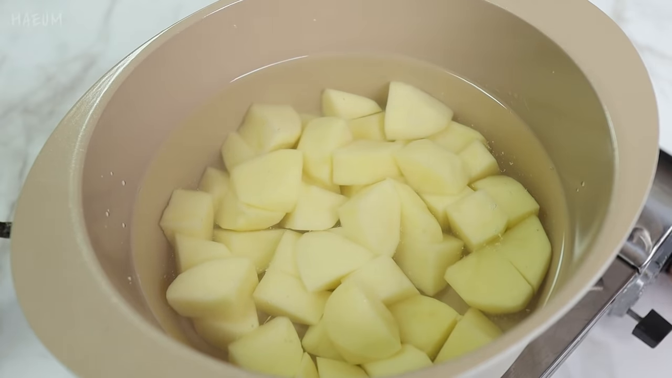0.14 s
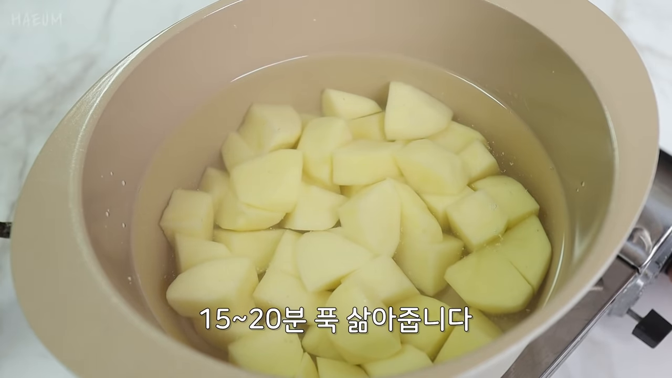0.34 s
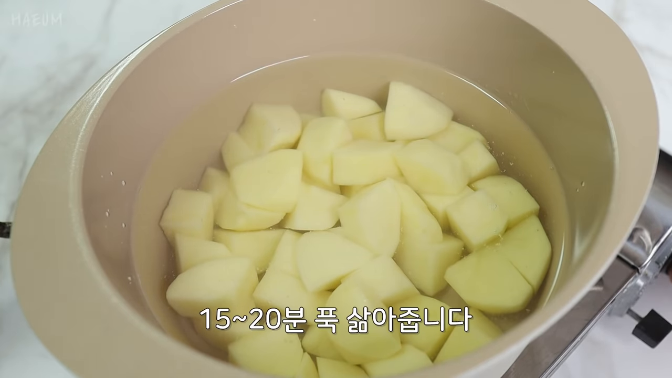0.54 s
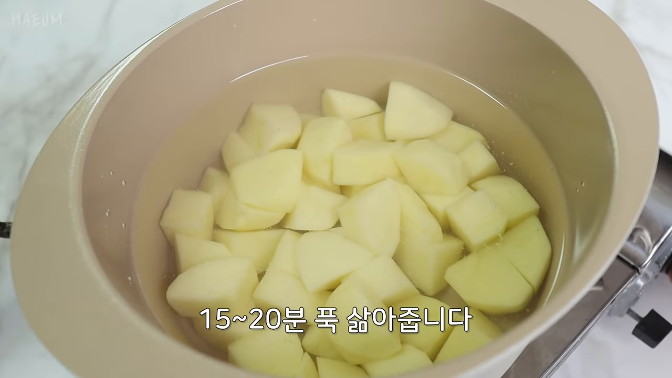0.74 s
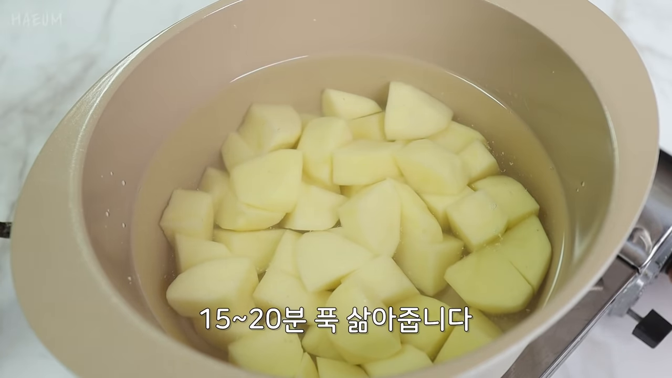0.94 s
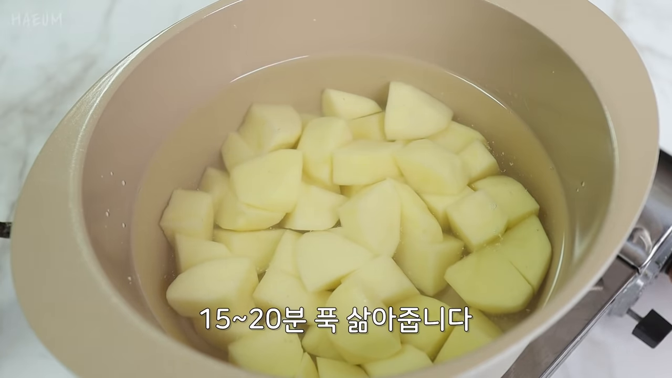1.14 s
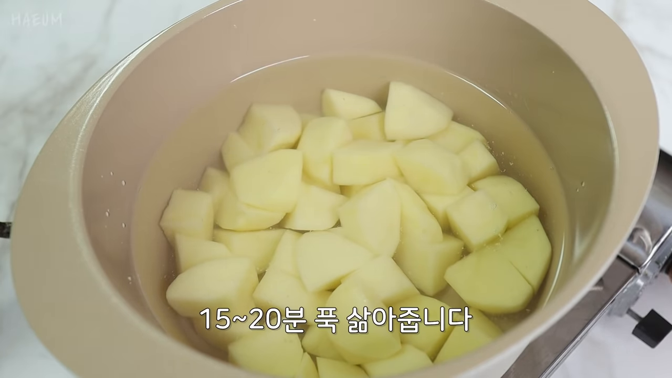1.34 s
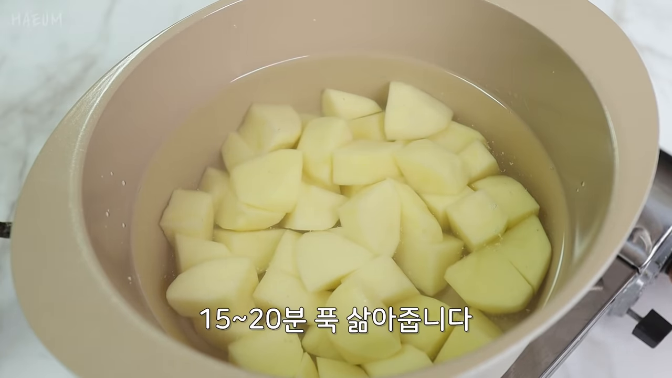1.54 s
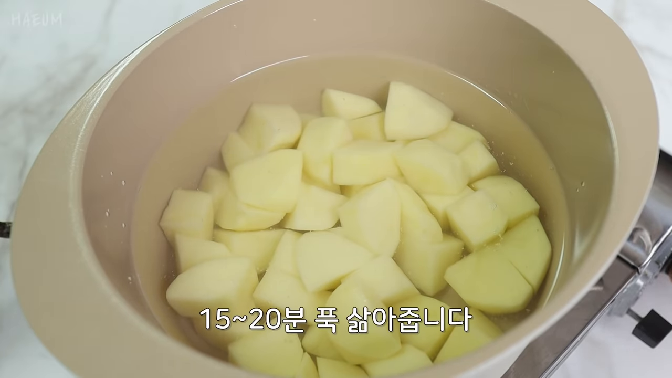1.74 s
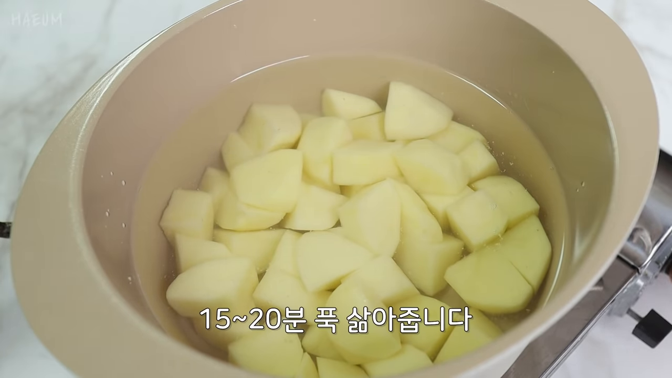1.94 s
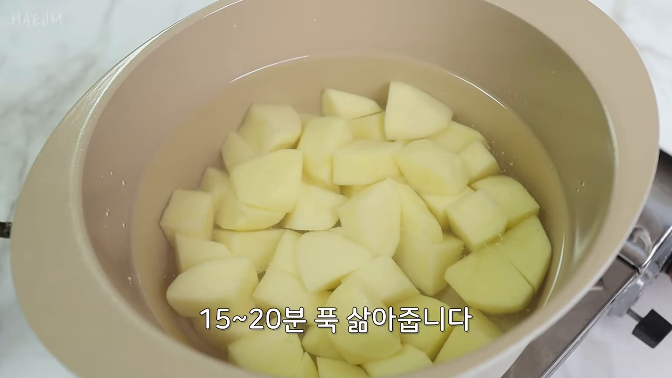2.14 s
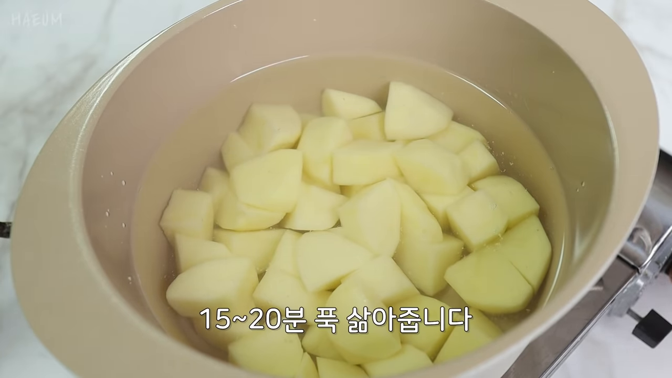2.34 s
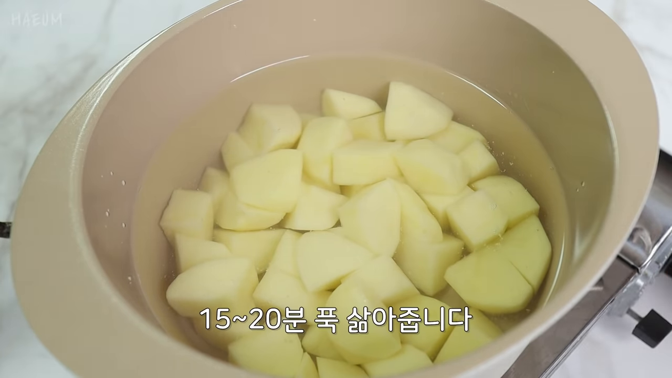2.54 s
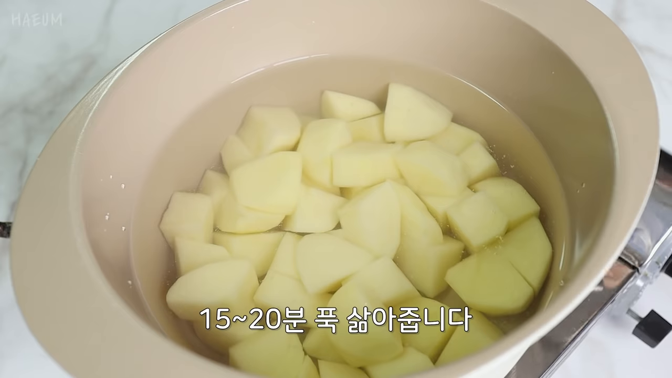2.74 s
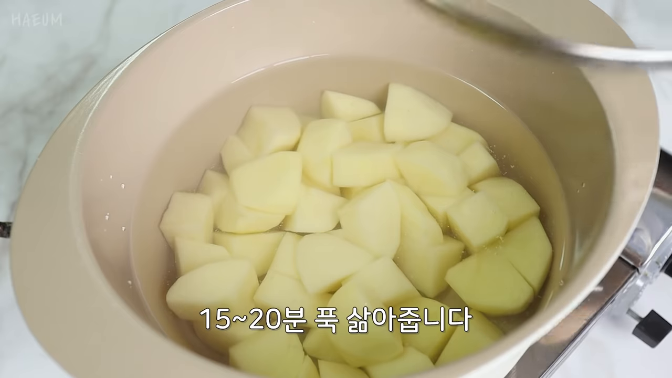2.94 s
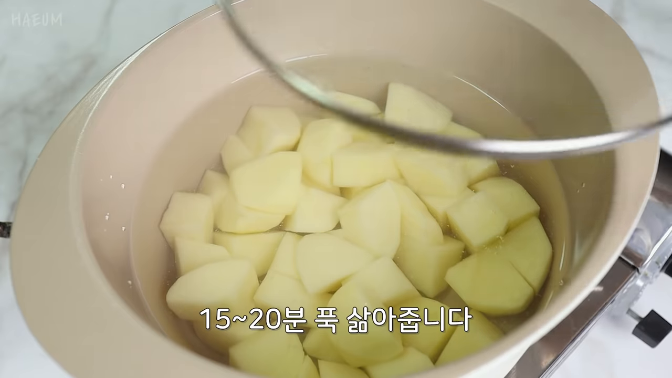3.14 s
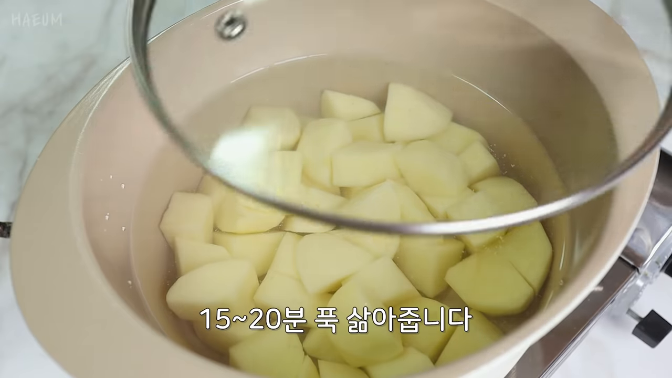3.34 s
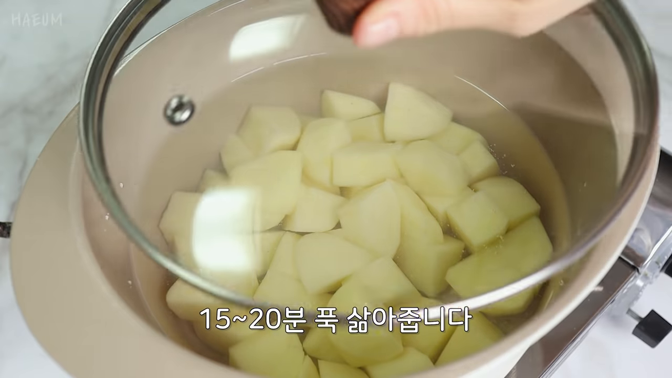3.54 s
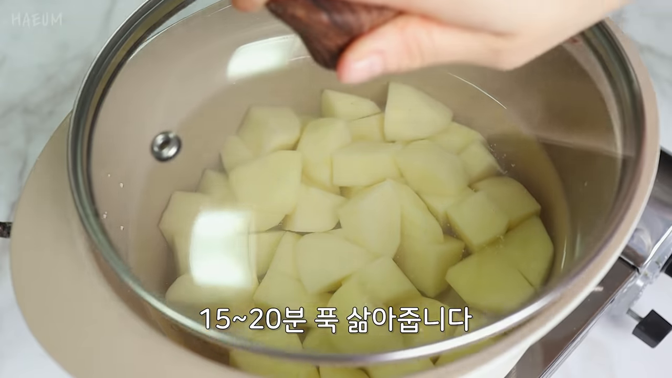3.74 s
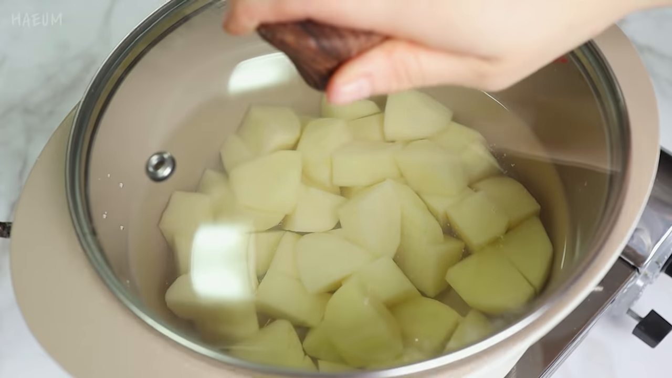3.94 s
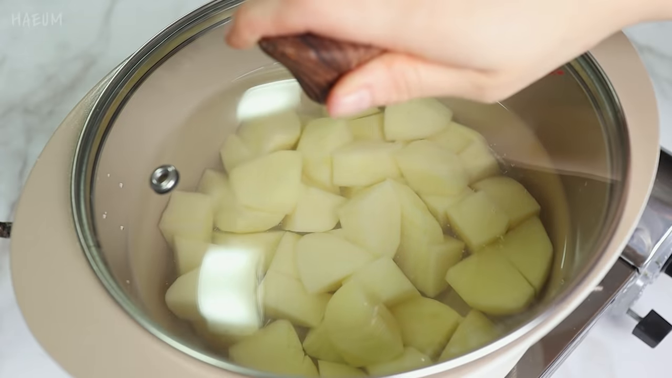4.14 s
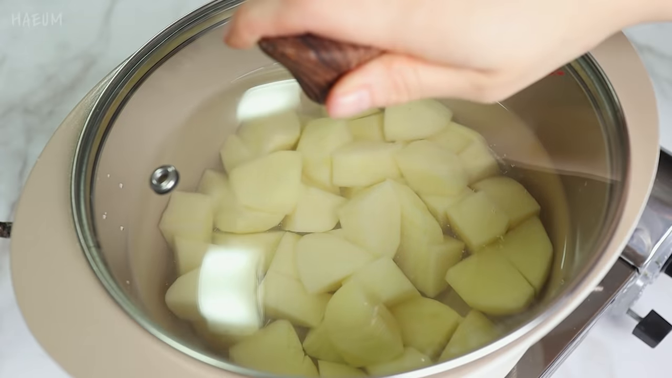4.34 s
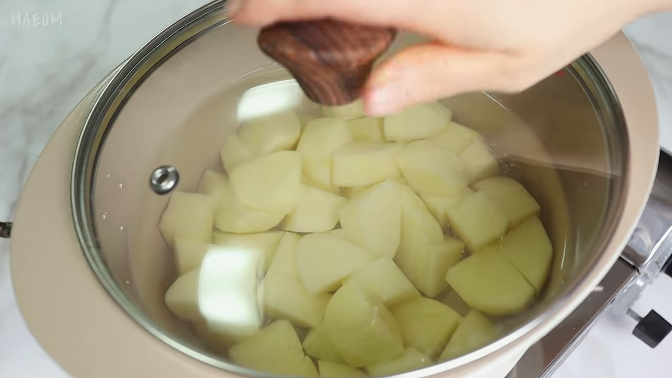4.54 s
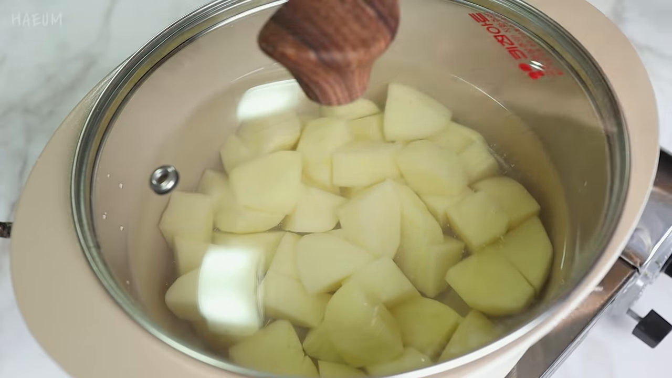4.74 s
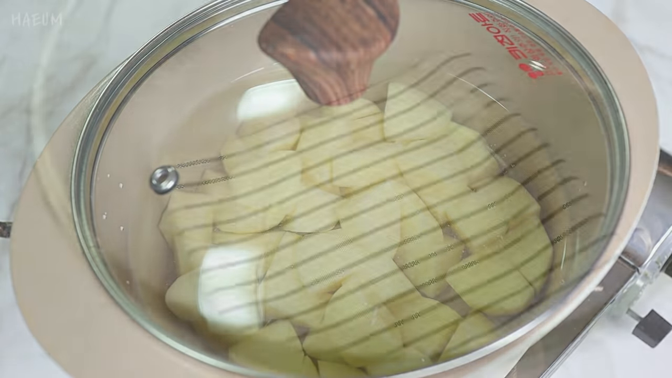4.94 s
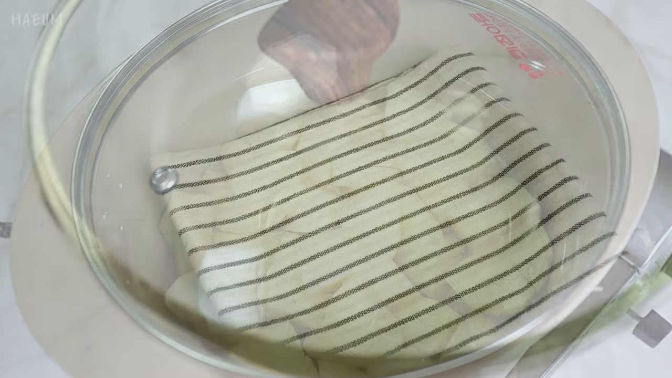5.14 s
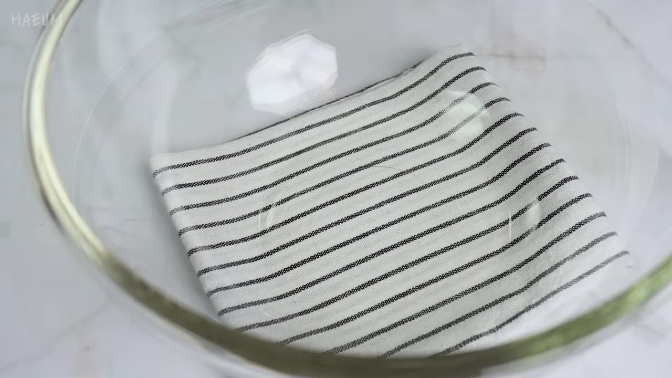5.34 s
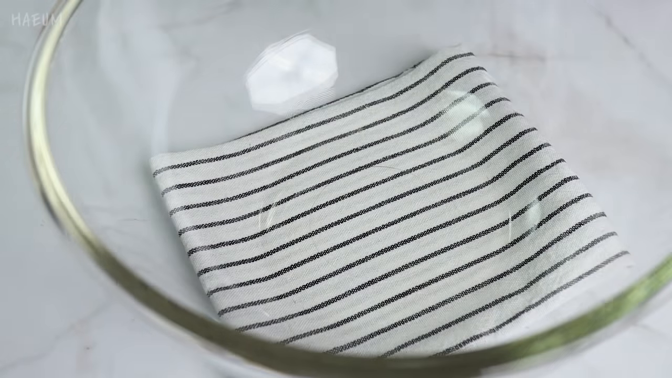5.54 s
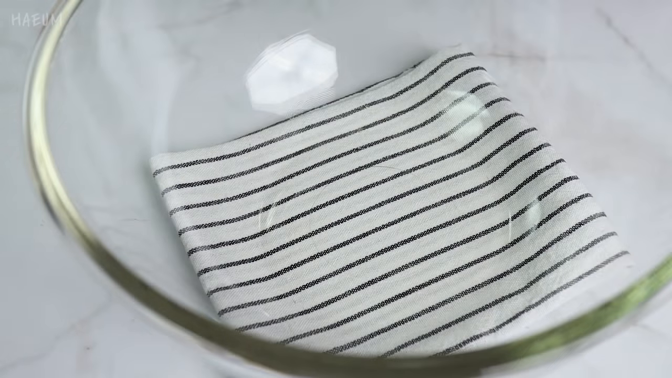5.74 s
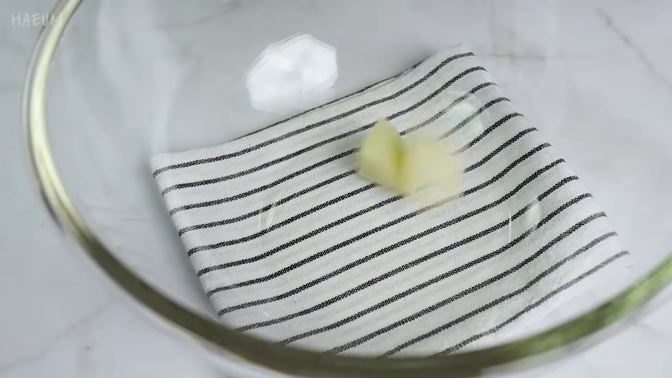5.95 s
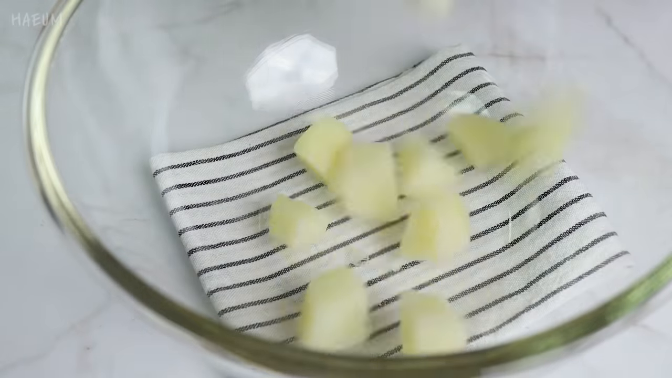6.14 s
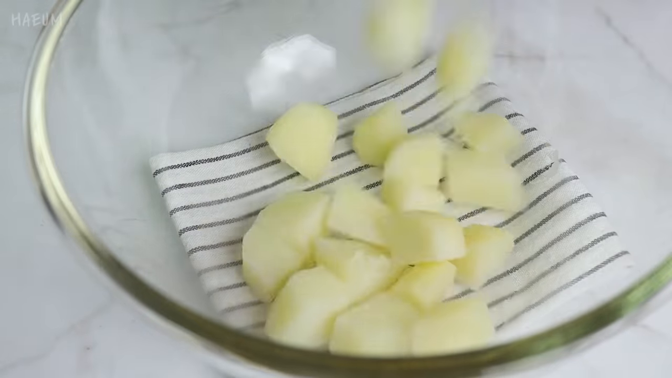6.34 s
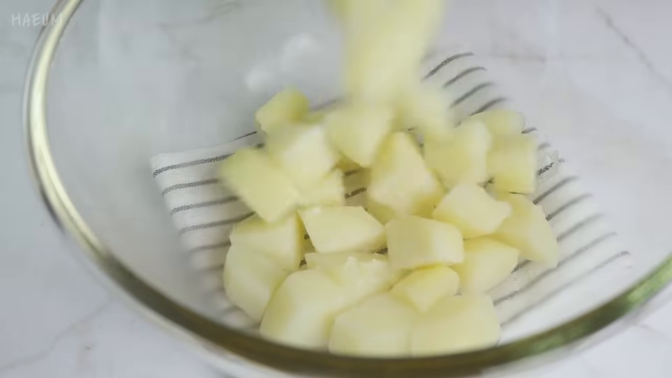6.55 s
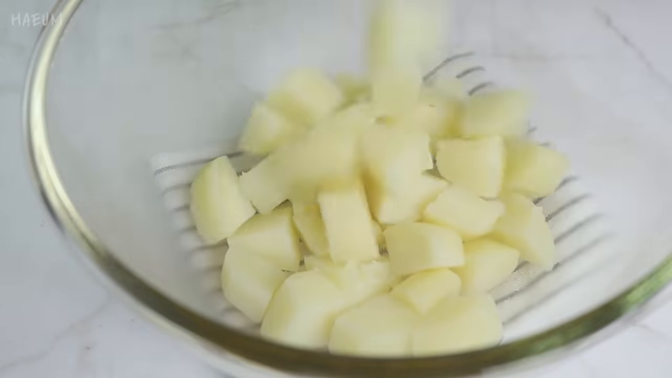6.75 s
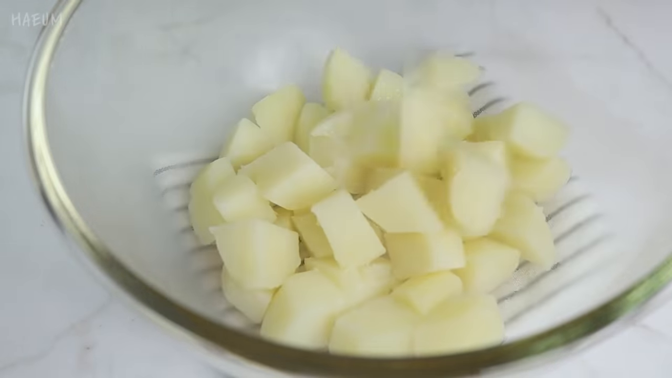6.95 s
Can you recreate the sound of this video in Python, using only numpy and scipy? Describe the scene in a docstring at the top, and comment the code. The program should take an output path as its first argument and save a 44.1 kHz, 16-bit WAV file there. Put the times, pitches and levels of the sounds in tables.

```python
"""Gas flame, glass lid and soft potatoes

A gas knob clicks, the burner lights with a snap and hisses under a pot, and a glass lid is set on the rim.
Then, at another counter, a pot is tipped and soft cooked potato pieces thud into a glass bowl,
shaking the counter on which the microphone stands. Blows are noise puffs plus dying sines; gas, air,
sliding and shaking are coloured noise; a kitchen tail follows the blows."""
import sys
import numpy as np
from scipy import signal
from scipy.fft import rfft, irfft
from scipy.io import wavfile
from scipy.ndimage import uniform_filter1d

SR = 44100
rng = np.random.default_rng(int(sys.argv[2]) if len(sys.argv) > 2 else 0)


def to_wav(s):
    """Save 16-bit WAV."""
    ch = np.atleast_2d(s).T  # columns
    pcm = np.round(np.clip(ch, -1, 1) * 32767)  # PCM
    wavfile.write(sys.argv[1], SR, pcm.astype(np.int16))


N = 308730  # samples
BINS, FRAMES = np.fft.rfftfreq(2048, 1 / SR), N // 512 + 5  # noise frequencies in Hz, noise frames
MOVE_S = 5.236  # from the stove to the other counter


def gain_of(db):
    """Decibels to gain."""
    return 10 ** (np.asarray(db) / 20)


def seconds():
    """Time of every sample."""
    return np.arange(N) / SR


def evened(x):
    """Scales to rms 1."""
    return x / np.sqrt(np.mean(x ** 2) + 1e-20)


def read(points, hz):
    """Reads a spectrum on a log-frequency axis."""
    f, value = np.transpose(points)
    return np.interp(np.log(hz + 1), np.log(f + 1), value)


def follow(rows):
    """Columns of a table of steps, one value a sample."""
    s, *columns = np.transpose(rows)
    step = np.searchsorted(s[1:], seconds())
    return [column[step] for column in columns]


def add(mix, s, sound):
    """Mixes a sound in at s seconds."""
    part = mix[round(s * SR):][:len(sound)]
    part += sound[:len(part)]


def swell(start, end, rise_db, fall_db):
    """Gain that rises to 1 at start, holds to end and falls; slopes in dB per second."""
    t = seconds()
    before_db = abs(rise_db) * np.maximum(start - t, 0)
    after_db = abs(fall_db) * np.maximum(t - end, 0)
    return gain_of(-np.minimum(before_db + after_db, 200))


def noise(db, same=.8, patchy_db=1.5):
    """Two channels of noise with drifting patches; db is the colour per bin, same the channel likeness."""
    a, b, c, d, patches = rng.standard_normal((FRAMES, 1025, 5)).T
    patches = uniform_filter1d(patches, size=20, axis=0)  # smooth over frequency
    patches = evened(uniform_filter1d(patches, size=6, axis=1))  # smooth over time
    same = np.clip(same, -1, 1)
    left = a + 1j * b
    right = same * left + np.sqrt(1 - same ** 2) * (c + 1j * d)
    z = np.array([left, right]) * gain_of(db[:, None] + patchy_db * patches)
    out = signal.istft(z, nperseg=2048, noverlap=1536)[1][:, :N]
    return out / np.sqrt(np.mean(out.mean(0) ** 2))


def ring(modes, spot_db=0):
    """Dying sines of a struck object; spot_db scatters their levels and slightly bends their pitches."""
    bend_per_db = .003  # what rests on the object bends its pitch
    t = np.arange(SR * 3 // 4) / SR
    shifts_db, bends = spot_db * rng.standard_normal((2, len(modes)))
    out = np.zeros(len(t))
    for (hz, db, t60), shift, bend in zip(modes, shifts_db, bends):
        fading = gain_of(db + shift - 60 * t / t60)
        out += fading * np.sin(2 * np.pi * hz * (1 + bend_per_db * bend) * t)
    return out


def burst(colour, t60, tilt_db, count=8192):
    """A coloured puff of noise with a sharp start; tilt_db brightens it per octave."""
    t, hz = np.arange(count) / SR, np.fft.rfftfreq(count, 1 / SR)
    colour_db = read(colour, hz) + tilt_db * np.log2(hz / 2000 + 0.052)
    puff = irfft(rfft(rng.standard_normal(len(t))) * gain_of(colour_db))
    attack = np.minimum(t / 0.0006, 1)
    return evened(puff) / 2 * gain_of(-60 * t / max(t60, .003)) * attack


def strikes(events, colour, modes, count=8192, spot_db=2.5):
    """Each blow is a puff of contact noise and a ring; every spot wakes the modes unevenly."""
    out = np.zeros(N)
    for s, db, t60, tilt_db, ring_db in events:
        add(out, s, gain_of(db) * burst(colour, t60, tilt_db, count=count))
        add(out, s, gain_of(ring_db) * ring(modes, spot_db))
    return out


# Knob clicks, the last being the igniter snap. Each row: start in seconds, contact level in dB,
# burst t60 in seconds, brightness in dB per octave, ring level in dB
CLICKS = [(0, -53.5, 0.61, 3, -80.5), (.213, -30.5, 0.097, 0, -76), (0.5849, 6.5, 0.032, 0.5, -23.5)]
# Colour of the knob detent. Each row: frequency in Hz, level in dB per Hz
KNOB_COLOUR = [(200, -44), (420, -15.5), (750, -9.5), (2020, -3.5), (2600, -3.5), (3600, -16.5),
               (4720, -11), (5760, -23), (10800, -18.5), (15000, -34)]
# Ringing grate and top plate, also woken by the snap. Each row: frequency in Hz, level in dB, t60 in seconds
STOVE_MODES = [(883, -4.5, .6), (1254, -20, .4), (1766, -23, .9), (2030, -14, .2), (2159, -30, 1.3),
               (2277, -15, .22), (2396, -27, .8), (2940, -22, .4), (4947, -22, .4), (5098, -23, .4)]


def knob_clicks():
    """The detent clicks in noise puffs and faintly rings the stove."""
    return strikes(CLICKS[:-1], KNOB_COLOUR, STOVE_MODES, count=16384)


# The valve turned in steps. Each row: start in seconds, hiss level in dB, setting (0 unlit, 1 low, 2 wide)
VALVE = [(0, -65, 0), (.585, -62.5, 1), (2.63, -57.5, 2)]
# Hollows of burner and pot that colour the gas jets. Each row: frequency in Hz, width in Hz,
# then levels in dB unlit, with the flame low and with the valve opened wider
JETS = [(1383, 174, -20, -9, -8), (1882, 92, -11.5, -7, -9), (2480, 31, -15, -19, -36.5),
        (2790, 240, -24, -22.5, -18), (3432, 48, -28.5, -10.5, -8.5), (4590, 110, -11, -7.5, -7.5),
        (5135, 110, -5, -6.5, -4), (6030, 28, -7, -6.5, -10), (6990, 32, -21, -17, -6.5),
        (7500, 21, -23.5, -15.5, 0.5), (8070, 120, -8, -4, -2), (8390, 49, -16.5, -15, 3),
        (8800, 52, -3.5, 0.5, -1), (9090, 80, -9, -4.5, 0), (9770, 35, -13.5, -2.5, 2.5),
        (9610, 110, -9, -1, -4), (10350, 150, -27, -16.5, -5.5), (10650, 130, -13, -14, -0.5),
        (10850, 85, -22, -15.5, 1.5), (10940, 190, -21, -9, 0), (11700, 83, -19.5, -8, -3),
        (12500, 300, -21, -17, -8), (13500, 200, -17.5, -23.5, -75), (14600, 200, -26, -25.5, -71)]
# Colour of the flame roar. Each row: frequency in Hz, level in dB per Hz
FLAME_COLOUR = [(12, -39), (20, 1.5), (32, -2.5), (108, -6.5), (261, 2), (427, -5.5), (686, -21.5),
                (795, -38.5), (1000, -39.5), (1300, -65.5), (2200, -120)]


def burner():
    """Jets hiss through the hollows of the burner; the flame flares up, settles and flutters low."""
    light_s, flare_s = .59, 0.35
    flare_hiss_db, flare_roar_db = 9.5, 6.5
    roar_db, sag_db_per_s = -49.5, -.5
    hiss_db, setting = follow(VALVE)
    t = seconds()
    lit = t > light_s
    flare = lit * np.exp(-abs(t - light_s) / flare_s)
    hz, width, *levels_db = np.transpose(JETS)
    peaks = 1 / (1 + (2 * (BINS[:, None] - hz) / width) ** 2) ** 0.93
    jets = np.zeros((2, N))
    for k, db in enumerate(levels_db):
        colour_db = 10 * np.log10(peaks @ gain_of(2 * db))  # hollows add in power
        jets += np.maximum(1 - abs(setting - k), 0) * noise(colour_db, 0.97, 1.0)
    hiss = gain_of(hiss_db + flare_hiss_db * flare) * jets
    roar_gain = lit * gain_of(roar_db + flare_roar_db * flare + sag_db_per_s * (t - light_s))
    roar = roar_gain * noise(read(FLAME_COLOUR, BINS), 0.95, 2.12)
    return (hiss + roar) * (t < MOVE_S)


# Colour of the air at the stove. Each row: frequency in Hz, level in dB per Hz
STOVE_AIR = [(12, -31), (20, 0), (48, -15), (306, -27), (387, -17), (464, -29), (938, -26.5), (1500, -52),
             (1950, -61), (3300, -120)]
# Colour of the air at the other counter. Each row: frequency in Hz, level in dB per Hz
COUNTER_AIR = [(12, -35.5), (20, -3.5), (96, -15), (499, -19.5), (660, -23), (1710, -31.5), (1910, -34),
               (16000, -41)]
# Thin steady hum. Each row: frequency in Hz, level in dB
HUM = [(387.6, -78)]


def air():
    """Quiet kitchen air as coloured noise at either place, with a thin hum of sines."""
    t = seconds()
    hum = sum(np.sqrt(2) * gain_of(db) * np.sin(2 * np.pi * hz * t) for hz, db in HUM)
    stove = gain_of(-69) * noise(read(STOVE_AIR, BINS), 0.54, 0.93)
    counter = gain_of(-63) * noise(read(COUNTER_AIR, BINS), 0.52, 1.9)
    return hum + np.where(t < MOVE_S, stove, counter)


# Colour of the igniter snap. Each row: frequency in Hz, level in dB per Hz
SNAP_COLOUR = [(59, -31.5), (100, -31), (691, -9.5), (910, -5.5), (2000, -2), (2220, -8), (4290, -11),
               (4670, -7), (11200, -14), (16000, -26)]
# Colour of gas catching fire. Each row: frequency in Hz, level in dB per Hz
WHOOMP_COLOUR = [(25, -8.5), (85, 2.5), (140, -3.5), (300, -45.5)]


def ignition():
    """A snap rings the stove, the gas catches with a low puff and the burning gas rushes on."""
    snap_s = CLICKS[-1][0]
    out = strikes(CLICKS[-1:], SNAP_COLOUR, STOVE_MODES, spot_db=1)
    add(out, snap_s, gain_of(-28.0) * burst(WHOOMP_COLOUR, 1.2, 0, count=32768))
    add(out, snap_s, gain_of(-31) * burst(SNAP_COLOUR, 0.88, -1.5, count=32768))
    return out


# Lid touching the rim. Each row: start in seconds, contact level in dB, brightness in dB per octave,
# ring level in dB
TOUCHES = [(4.0548, -6, -6.5, -17.5), (4.069, -10, -6, -26), (4.078, -11, -3.5, -18.5),
           (4.1203, -13, 4, -27), (4.1235, 1, -4.5, -12.5), (4.129, -5, 3, -23), (4.134, -4.5, 2, -23),
           (4.142, -6.5, 0, -25), (4.147, -7.5, -3.5, -24), (4.152, -16, -1, -34)]
# Colour of the lid knock. Each row: frequency in Hz, level in dB per Hz
KNOCK_COLOUR = [(47, -46), (80, -20.5), (203, -8.5), (1020, -11), (1510, -5.5), (2770, -9), (3830, -5.5),
                (6570, -23), (11000, -23.5), (14000, -61)]
# Ringing glass lid. Each row: frequency in Hz, level in dB, t60 in seconds
LID_MODES = [(350, 1, 0.06), (646, -18, .07), (1247, -9, 0.075), (1485, 3.5, 0.05), (2080, -12, 0.14),
             (2445, -3, 0.061), (2710, -18, .12), (3040, -11, 0.14), (3280, -14, 0.033), (3830, -4, 0.031),
             (4000, -9, 0.04), (4660, -12.5, 0.065)]


def lid_touches():
    """The glass lid meets the rim in quick knocks, each waking its modes."""
    touch_t60_s = 0.032
    events = [(s, db, touch_t60_s, tilt_db, ring_db) for s, db, tilt_db, ring_db in TOUCHES]
    return strikes(events, KNOCK_COLOUR, LID_MODES)


# Soft bumps of the tipped pot. Each row: start in seconds, contact level in dB, brightness in dB per octave
BUMPS = [(5.337, -57, 9.5), (5.491, -54, -7.5), (5.622, -56.5, 15), (5.631, -43, -1.5), (5.656, -53.5, 8),
         (5.728, -53.5, -4), (5.743, -46.5, 1), (5.772, -51, 1.5)]
# Colour of the bumps. Each row: frequency in Hz, level in dB per Hz
BUMP_COLOUR = [(120, -47), (200, -36), (403, 6), (591, -10), (1140, -19), (1400, 4), (2010, -16),
               (3000, -11.5), (9000, -39.5), (11700, -73), (19800, -120)]
# Ringing pot. Each row: frequency in Hz, level in dB, t60 in seconds
POT_MODES = [(430, -8, 0.031), (1406, 2.5, 0.051), (1640, -9, 0.048), (2850, -3, 0.028)]


def pot_bumps():
    """The tipped pot bumps softly, its ring set below each contact puff."""
    bump_t60_s = 0.065
    events = [(s, db, bump_t60_s, tilt_db, db - 8.5) for s, db, tilt_db in BUMPS]
    return strikes(events, BUMP_COLOUR, POT_MODES)


# Wet pieces peeling off one another. Each row: start in seconds, level in dB, pitch in Hz
TICKS = [(5.443, -46, 9800), (5.605, -44, 11900), (5.776, -35.5, 10500), (5.7932, -31.5, 10400),
         (5.8127, -32, 4830), (5.881, -35, 9740), (6.035, -25, 8400), (6.26, -42, 3000), (6.297, -24, 1200),
         (6.361, -38, 6500), (6.379, -34, 8500), (6.3905, -31.5, 2580), (6.3954, -32, 9190),
         (6.424, -41, 6000), (6.454, -40, 8000), (6.4667, -46, 1800), (6.4914, -30.5, 2100),
         (6.5648, -33, 9400), (6.729, -38, 11000), (6.743, -43, 9000), (6.821, -32.5, 10600),
         (6.8831, -26.5, 10400), (6.929, -35, 10500), (6.949, -42, 11000)]


def sticky_ticks():
    """Tiny sticky snaps: short puffs around a pitch."""
    out = np.zeros(N)
    for s, db, hz in TICKS:
        colour = [(hz / 2, -26), (hz, 0), (hz * 1.4, -12)]
        add(out, s, gain_of(db) * burst(colour, .012, 0))
    return out


# Pieces sliding and rolling over one another. Each row: peak time in seconds, rise in dB per second,
# fade in dB per second, wet slither level in dB, tumbling level in dB
SLIDES = [(5.84, 87.5, 121, -61.5, -69.5), (6.003, 600, 138, -52.5, -55), (6.095, 6000, 400, -40, -51.5),
          (6.18, 200, 120, -54, -60.5), (6.292, 1500, 330, -36, -44), (6.4, 150, 48, -52.5, -61),
          (6.53, 111, 150, -52, -50), (6.635, 1100, 280, -54, -66), (6.734, 5000, 151.5, -52.5, -62),
          (6.891, 68, 83, -59, -62)]
# Colour of the wet slither. Each row: frequency in Hz, level in dB per Hz
SLITHER_COLOUR = [(3240, -12.5), (5500, -14.5), (9400, 1.5), (12000, -0.5), (14100, -11), (16000, -23)]
# Colour of the tumbling. Each row: frequency in Hz, level in dB per Hz
TUMBLE_COLOUR = [(180, -35), (400, 9), (600, -18.5), (1130, -7), (3300, -6), (5200, -7.5), (8000, -44)]


def sliding_pieces():
    """Wet faces slide and crackle: noise broken up by a random train of contacts letting go."""
    swells = np.array([swell(s, s, rise, fade) ** 2 for s, rise, fade, *_ in SLIDES])
    powers = gain_of(np.transpose(SLIDES)[3:]) ** 2
    slither_gain, tumble_gain = np.sqrt(powers @ swells)  # slides add in power
    heights = gain_of(3.9 * np.minimum(rng.exponential(1, N), 3))
    snaps = heights * (rng.random(N) < 350 / SR)  # about 350 a second
    grain = 1 + signal.lfilter([1], [1, -.985], snaps)  # contacts break suddenly and fade in a few ms
    slither = slither_gain * noise(read(SLITHER_COLOUR, BINS), 0.94, 1.5)
    tumble = tumble_gain * noise(read(TUMBLE_COLOUR, BINS), 0.88, 1.0)
    return slither * evened(grain) + tumble * evened(grain ** .4)


# Rushes of pieces that shake the counter. Each row: start in seconds, end in seconds, level in dB
RUSHES = [(6, 6.691, -27), (6.729, 6.938, -26), (6.987, 7.1, -41)]
# Colour of the counter moving up and down. Each row: frequency in Hz, level in dB per Hz
SHAKE_COLOUR = [(12, -23), (20, 2), (66, 10.5), (94, -3.5), (136, -27), (163, -28), (195, -41), (300, -53),
                (390, -66), (660, -120)]


def counter_shake():
    """Low noise as the counter shakes under the rushes; a faint shake grows as the pot leans over."""
    rise_db_per_s, fall_db_per_s = 2500, 397
    load = gain_of(-68) * swell(5.99, N / SR, 200, 0)  # the leaning pot
    for start, end, db in RUSHES:
        load += gain_of(db) * swell(start, end, rise_db_per_s, fall_db_per_s)
    return load * noise(read(SHAKE_COLOUR, BINS), .97, 1.2)


# Pieces landing in the bowl. Each row: start in seconds, contact level in dB, brightness in dB per octave,
# glass ring level in dB, counter thud level in dB
LANDINGS = [(5.9996, -23.5, -1.5, -36, -12.5), (6.029, -41, 1.5, -48, -39), (6.0939, -29.5, 7.5, -36, -15),
            (6.116, -47, 3, -46, -36), (6.1506, -32, -15, -47.5, -21.5), (6.1897, -44, 2, -44, -25),
            (6.2155, -43.5, -3, -69, -15), (6.2535, -29, 0, -52, -15.5), (6.283, -22.5, -4, -25, -20.5),
            (6.3015, -18, -1, -24.5, -18), (6.3909, -36.5, 1, -50, -19.5), (6.4381, -42, -1, -56, -16),
            (6.4915, -35.5, 1.5, -54, -16.5), (6.631, -47, -1.5, -56, -40), (6.732, -44, 1, -71, -33),
            (6.7738, -21, 5, -55, -21.5), (6.9029, -31, 3, -62, -39)]
# Colour of the wet slap. Each row: frequency in Hz, level in dB per Hz
SLAP_COLOUR = [(180, -25), (300, -0.5), (855, -19), (1760, -9), (2070, -23.5), (3730, -17), (7540, -29),
               (10300, -14), (15000, -39)]
# Ringing glass bowl. Each row: frequency in Hz, level in dB, t60 in seconds
BOWL_MODES = [(398.6, -19, 0.3), (1170, -17.5, 0.041), (2984, 3.5, 0.037), (2995, -26, 0.09),
              (4760, -4, 0.035), (6400, -19, .05), (7300, -17, 0.07), (7800, -12, 0.045)]


def bowl_landings():
    """Soft pieces slap the glass and wake the modes of the bowl."""
    slap_t60_s = 0.025
    events = [(s, db, slap_t60_s, tilt_db, ring_db) for s, db, tilt_db, ring_db, _ in LANDINGS]
    return strikes(events, SLAP_COLOUR, BOWL_MODES, spot_db=1.25)


def counter_thuds():
    """Each landing pushes the counter down, and it rings in two low modes."""
    thud = -ring([(67.6, 1.5, 0.056), (144.0, -20.0, 0.15)])  # minus: down first
    thud = thud * np.minimum(np.arange(len(thud)) / (0.00376 * SR), 1)  # the thud swells in over a few ms
    out = np.zeros(N)
    for s, *_, thud_db in LANDINGS:
        add(out, s, gain_of(thud_db) * thud)
    return out


# Colour of the swaying stand. Each row: frequency in Hz, level in dB per Hz
STAND_COLOUR = [(15, -31), (26, -8.5), (31, 0), (36, -14), (55, -44), (120, -52), (300, -67), (700, -120)]


def stand_sway():
    """The stand is set swaying and calms slowly: deep noise, opposite in the two channels."""
    swing = gain_of(-21) * swell(6.005, 6.005, 2500, 2)
    return swing * noise(read(STAND_COLOUR, BINS), 1, 1.)[0] * np.array([[1.15], [-1]])


# Decay of the kitchen. Each row: frequency in Hz, t60 in seconds
KITCHEN_DECAY = [(200, 0.5), (1000, 0.33), (4000, 0.42), (10000, 0.26), (15000, 0.044)]


def kitchen(x):
    """Sparse taps of random sign, each band dying at its own speed."""
    taps = np.zeros((2, SR))
    at = np.arange(200, SR - 20, 20) + rng.integers(0, 20, (2, (SR - 201) // 20))
    np.put_along_axis(taps, at, rng.choice([-1., 1.], at.shape), 1)
    hz, t, z = signal.stft(taps, SR, nperseg=256)
    decay = gain_of(-60 * t / read(KITCHEN_DECAY, hz)[:, None])
    tail = signal.istft(z * decay, SR, nperseg=256)[1]
    tail = tail + 0.46 * tail[::-1]  # the two capsules sit close together
    return signal.fftconvolve(x[None], tail / np.linalg.norm(tail[0]), axes=1)[:, :N]


def leaning(db):
    """Channel gains that raise the left and lower the right by db."""
    return gain_of([[db], [-db]])


def first_echoes(near):
    """Tiles and counter answer at once, otherwise on either side; delays in samples."""
    left, right = near
    return np.array([np.roll(left, 130) - np.roll(right, 57), np.roll(right, 170) - np.roll(left, 83)])


def scene():
    """All sources, the knocks and ticks with the kitchen behind them."""
    knob, snap, lid = knob_clicks(), ignition(), lid_touches()
    food = bowl_landings() + pot_bumps()
    sticky = sticky_ticks()
    to_kitchen = gain_of(-13.5) * knob + gain_of(-11.0) * snap + gain_of(-14.5) * lid
    to_kitchen += gain_of(-19) * (food + sticky)
    near = (knob + snap + lid + food) * leaning(.6) + sticky * leaning(1.8)
    near = near + gain_of(-16.5) * first_echoes(near)
    steady = (burner() + air()) * leaning(.7)
    moving = (counter_shake() + counter_thuds()) * leaning(.8) + stand_sway() + sliding_pieces()
    return near + kitchen(to_kitchen) + steady + moving


# The whole level dips around the two loudest knocks and springs back. Each row: start in seconds,
# end in seconds, first level in dB, last level in dB
DIPS = [(.565, .8952, -8, -17), (4.0345, 4.3335, -15, -15)]


def level_dips():
    """Gain that drops at once, deepens mostly towards the end of a dip and springs back."""
    t = seconds()
    dip_db = np.zeros(N)
    for start, end, first, last in DIPS:
        progress = np.clip((t - start) / (end - start), 0, 1)
        dip_db += ((t > start) & (t < end)) * (first + (last - first) * progress ** 3)
    return gain_of(dip_db)


def record(dry):
    """Wider treble, the level dips, the loudest peaks are rounded off, then the band limits."""
    wide_hz, wide_db = 8050, 6.5  # the capsules face apart, so the treble is wider
    rumble_hz, edge_hz, ceiling = 12, 16200, .38
    side = (dry[0] - dry[1]) / 2
    bright = signal.filtfilt(*signal.butter(1, wide_hz, "high", fs=SR), side)
    wide = dry + (gain_of(wide_db) - 1) * bright * np.array([[1], [-1]])
    rounded = ceiling * np.tanh(wide * level_dips() / ceiling)
    rounded = signal.sosfilt(signal.butter(1, rumble_hz, "high", fs=SR, output="sos"), rounded)
    treble_edge = signal.firwin(511, edge_hz, window=("kaiser", 9), fs=SR)
    return signal.oaconvolve(rounded, treble_edge[None], "same")


dry = scene()
out = record(dry)
to_wav(out)
```